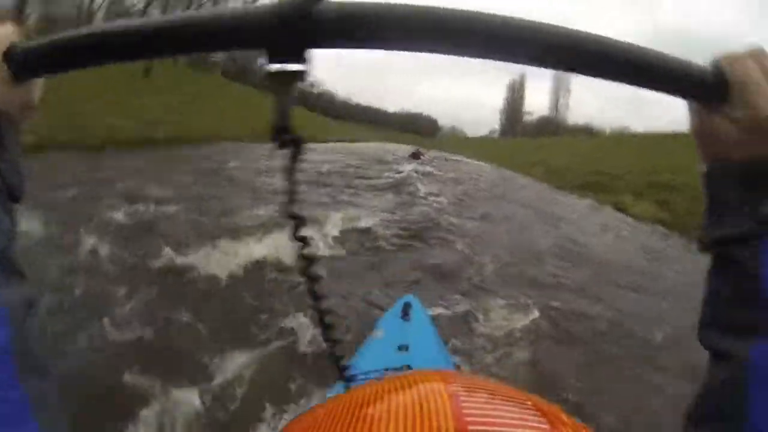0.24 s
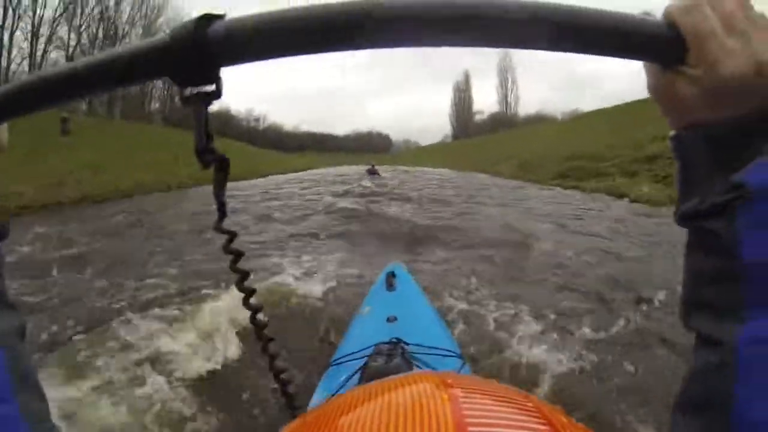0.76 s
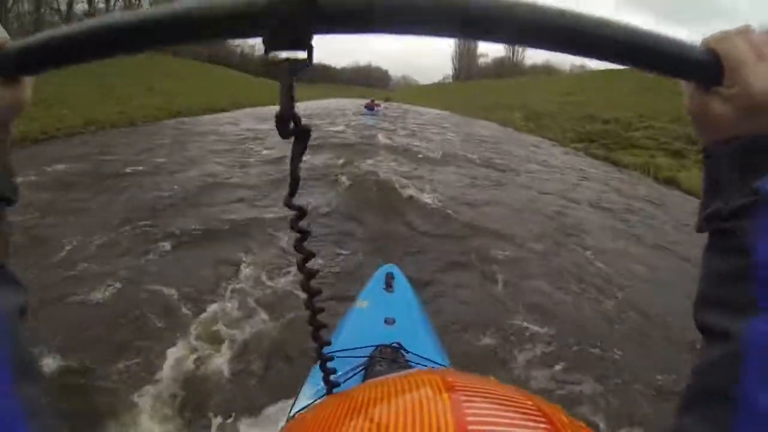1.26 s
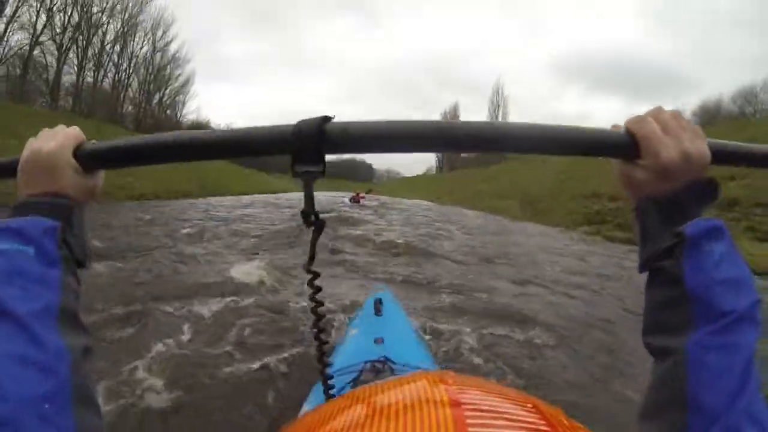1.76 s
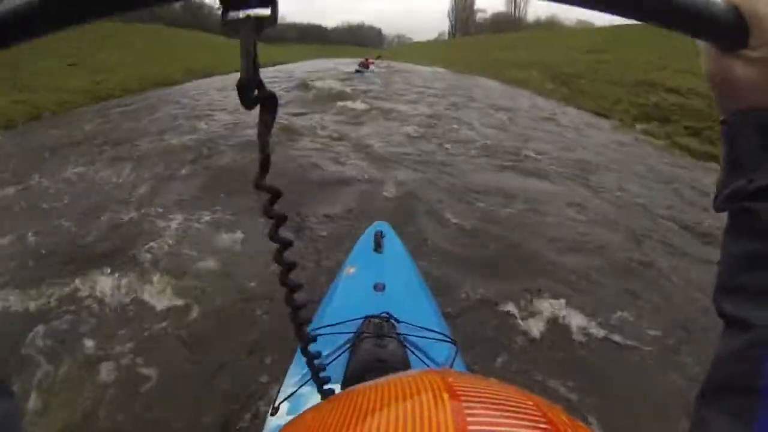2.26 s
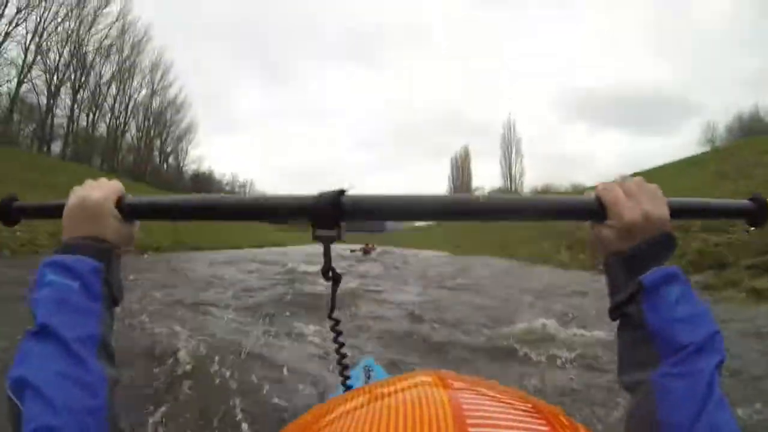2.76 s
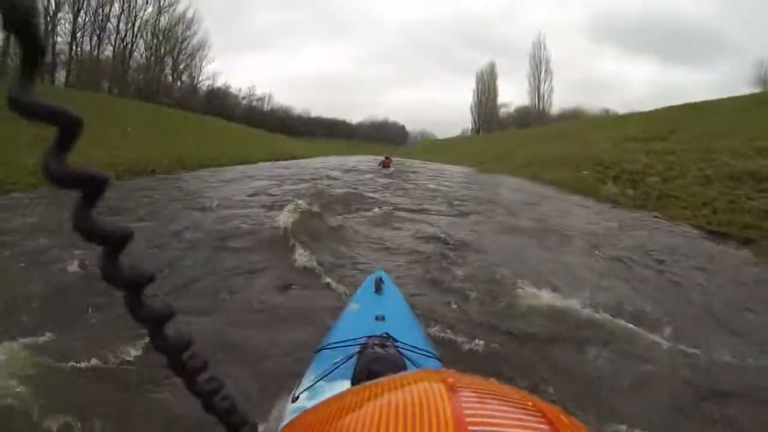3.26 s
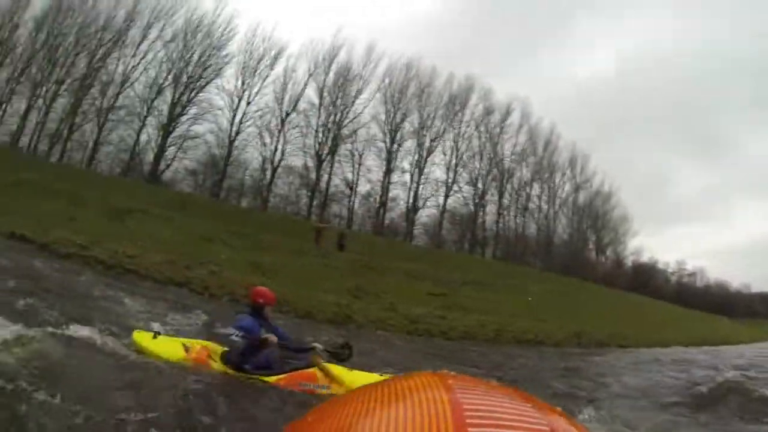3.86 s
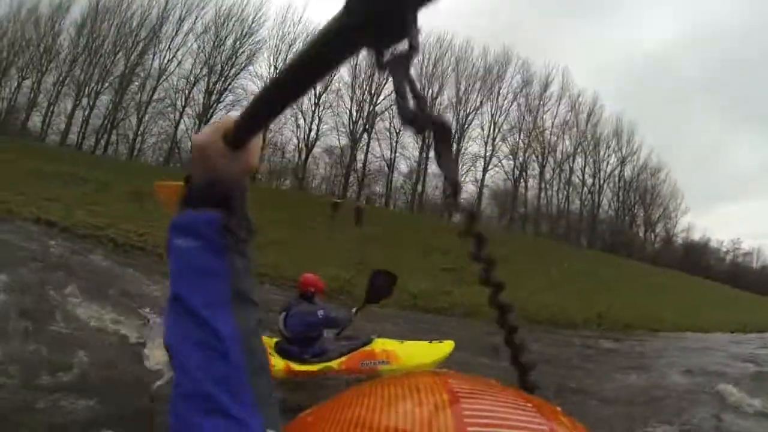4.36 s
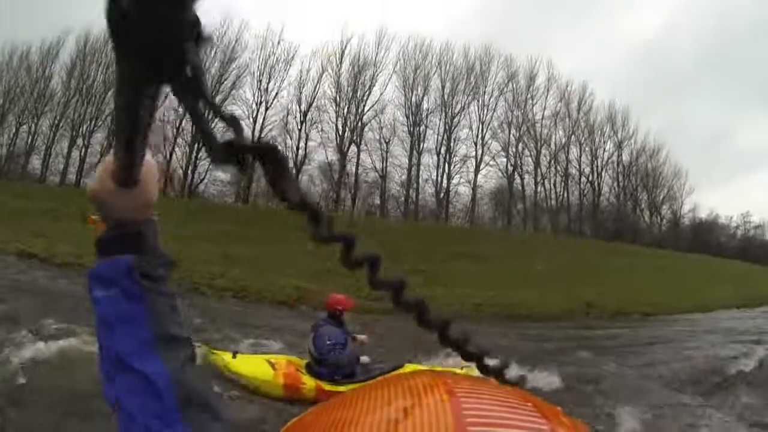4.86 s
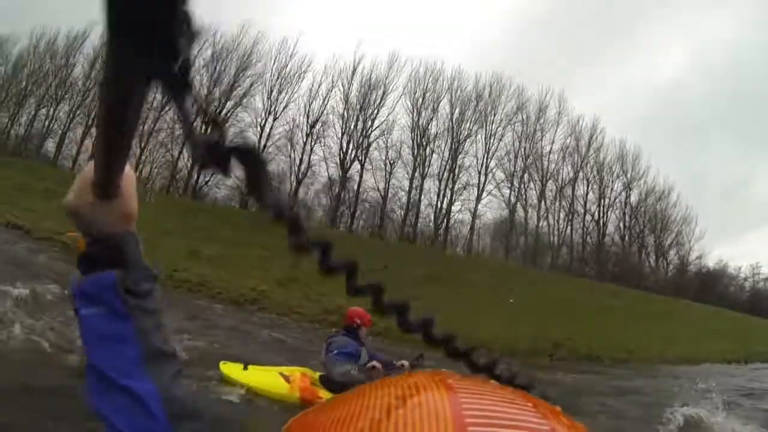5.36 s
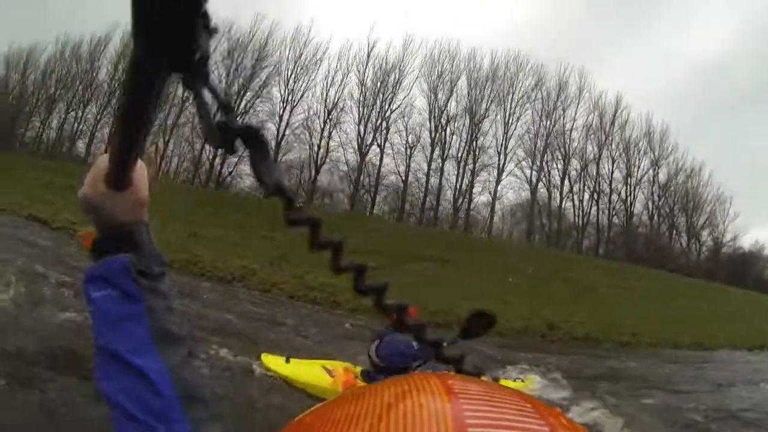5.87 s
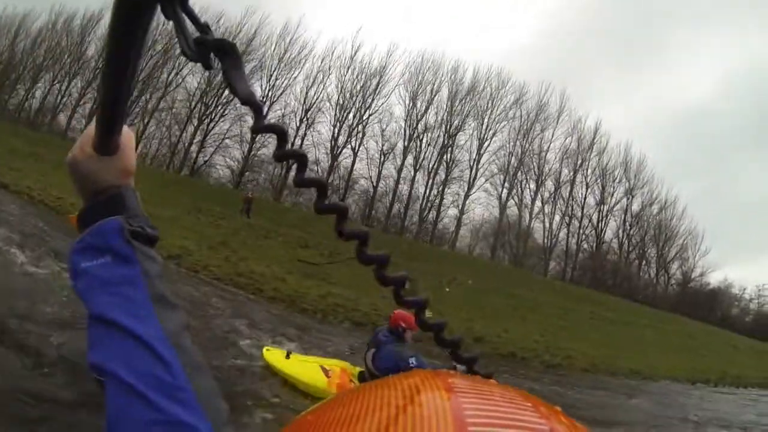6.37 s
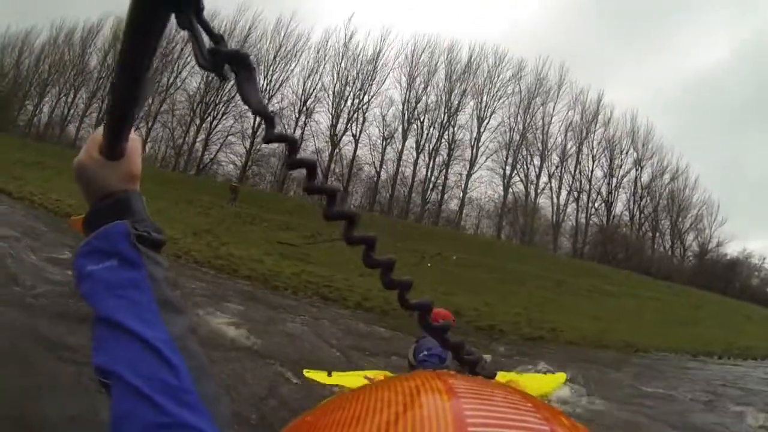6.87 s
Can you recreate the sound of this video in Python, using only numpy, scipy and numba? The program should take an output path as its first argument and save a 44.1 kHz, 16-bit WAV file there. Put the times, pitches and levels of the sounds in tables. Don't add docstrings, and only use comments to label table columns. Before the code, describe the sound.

Steady hollow rush of river water under low, thudding wind gusts, growing rougher midway, with plastic knocks, dull mount creaks and drops tapping the lens.

```python
import sys
import numpy as np
from scipy import signal
from scipy.fft import rfft, irfft, next_fast_len
from scipy.io import wavfile
from scipy.ndimage import uniform_filter1d
from numba import njit

SR = 44100
rng = np.random.default_rng(int(sys.argv[2]) if len(sys.argv) > 2 else 0)


def attenuation_scalar(level_db):
    decades = np.asarray(level_db, float) / 20
    return 10 ** decades


def transcribe(signal):
    frames = np.atleast_2d(signal).T
    limited = np.clip(frames, -1, 1)
    pcm = np.round(limited * 32767).astype(np.int16)
    wavfile.write(sys.argv[1], SR, pcm)


N = 313992

# (time [s], buffeting [dB], share of small quick eddies [dB])
WIND_STRENGTH = [(0.0, -6, -16.5), (0.03, -28.5, 14), (0.67, -18.5, 8.5), (0.73, -27, -17),
                 (0.81, -19, 9.5), (1.55, -31.5, 4.5), (1.63, -21, 7), (2.26, -26.5, 4.5), (2.56, -10, 8.5),
                 (2.79, -22.5, 4.5), (3.15, -17, 9), (3.31, -31, 17), (3.35, -17.5, -2), (5.31, -18.5, -13),
                 (5.35, -29.5, -1.5), (5.47, -13.5, -10), (7.0, -20.5, -11), (7.12, -7.5, -0.5)]
# (time [s], height [of full scale], width [ms], gain ducked after it [dB])
PUSHES = [(0.403, -0.44, 6.8, -2), (0.444, 0.43, 7.4, 3.5), (0.582, 0.39, 11, 2.5), (0.671, 0.37, 16, -2.5),
          (2.467, 0.35, 2.5, 0.5), (2.546, -0.0084, 12, 1), (2.598, 0.72, 3.3, 6), (2.644, -0.29, 5.8, 5.5),
          (2.894, 0.59, 3.5, 4), (2.999, 0.45, 5, 6.5), (3.134, 0.42, 6, 7), (3.169, 0.49, 4.6, 0.5),
          (3.394, -0.54, 4.4, 2.5), (3.5, 0.77, 3.3, 5), (3.611, -0.47, 12, 6.5), (3.836, -0.43, 9, 5.5),
          (4.187, 0.49, 5.6, 10), (4.54, 0.54, 5, 10), (4.826, 0.44, 9.3, 4.5), (5.003, 0.66, 5.4, 9),
          (5.222, -0.51, 3.6, -1.5), (5.309, -0.68, 4.5, 7.5), (5.49, -0.5, 5.3, 6.5),
          (5.546, 0.18, 14, 7.5), (5.745, -0.54, 10, 9), (5.925, 0.21, 27, 5.5), (5.988, -0.35, 7.5, 9.5),
          (6.175, 0.48, 5, 5.5), (6.476, -0.57, 3.5, 10), (7.116, -0.26, 39, 2)]
# (pitch [Hz], level [dB per Hz])
BUFFET_TONE = [(5, -1), (16, 2.5), (27, -0.5), (45, -14), (65, -29), (90, -40.5)]
# (pitch [Hz], level [dB per Hz])
FLUTTER_TONE = [(45, 5.5), (70, 3.5), (120, 1), (170, -5.5), (230, -14), (290, -14), (350, -36.5),
                (480, -62.5)]
# (start [s], length [s], flutter level [dB])
GUSTS = [(0.005, 0.085, -41.5), (0.206, 0.25, -42.5), (0.403, 0.035, -33), (0.496, 0.21, -44),
         (1.616, 0.1, -44.5), (1.797, 0.11, -46), (2.037, 0.036, -43), (2.216, 0.17, -44.5),
         (2.331, 0.22, -41), (2.464, 0.21, -36.5), (2.844, 0.09, -37.5), (2.96, 0.08, -34.5),
         (3.115, 0.074, -30), (3.346, 0.19, -34.5), (3.537, 0.21, -40.5), (3.799, 0.25, -44),
         (4.022, 0.085, -35), (4.116, 0.21, -40), (4.284, 0.27, -35), (4.521, 0.29, -40),
         (4.877, 0.26, -38), (5.193, 0.2, -36), (5.451, 0.092, -37), (5.568, 0.27, -42.5),
         (5.768, 0.22, -41.5), (5.958, 0.09, -35), (6.029, 0.36, -43), (6.421, 0.082, -39.5),
         (6.57, 0.14, -45), (7.078, 0.036, -37.5)]
# (time [s], peak [dB], pitch [Hz])
PUFFS = [(1.66, -34.5, 144.8), (1.72, -29, 124), (2.045, -37.5, 192.6), (2.465, -44.5, 148.5),
         (2.528, -41, 171), (2.59, -42, 194.7), (2.835, -33, 187.3), (2.872, -35.5, 168), (2.9, -21, 144.3),
         (2.905, -32.5, 224.6), (2.963, -24, 192.7), (2.968, -35, 256), (3.015, -37, 194.5),
         (3.075, -42.5, 217.3), (3.13, -29.5, 174.7), (3.15, -28, 262), (3.19, -39, 232), (3.318, -42, 270),
         (3.365, -26.5, 145.8), (3.41, -28, 132.3), (3.44, -39, 208.3), (3.478, -24.5, 130.5),
         (3.545, -33, 126.2), (3.59, -38.5, 178), (3.92, -31.5, 109.6), (4.04, -26, 131.6),
         (4.06, -24, 183.5), (4.075, -36, 242), (4.165, -36.5, 260), (4.243, -37.5, 260),
         (4.29, -33.5, 221), (4.315, -28.5, 193.3), (4.365, -31, 209), (4.4, -29.5, 126.3),
         (4.43, -34, 106.9), (4.74, -43.5, 239), (4.77, -33.5, 137), (5.214, -40, 147.5),
         (5.978, -38.5, 147.4)]
# (time [s], peak [dB], dull part [dB], rattle length [ms])
KNOCKS = [(1.34, -38.5, -20.5, 1.2), (1.423, -31.5, -28, 2.5), (2.189, -37, -21.5, 1.2),
          (2.4877, -21.5, -26, 1.4), (2.627, -43.5, -5, 1.7), (2.981, -30, 3, 4.5), (3.15, -21, -0.5, 1.7),
          (3.202, -42, -5.5, 1.6), (3.287, -38, -14, 3.1), (4.2495, -40, -8, 1.2), (4.302, -39.5, -6, 2.5),
          (5.473, -36, -11, 2.1), (5.674, -39, -20, 4), (5.707, -29.5, -23.5, 2.9),
          (5.896, -50.5, -15, 1.6), (5.919, -34, -20, 2), (5.97, -40, -10, 2.8), (3.244, -30, -16, 4.6),
          (3.375, -36, 9, 2.1), (3.984, -34.5, -20, 1.2), (4.321, -31.5, 8.5, 1.1), (4.641, -37, 9.5, 1.5),
          (4.929, -41, 12, 1.2), (5.1703, -28.5, 5.5, 1), (5.194, -30, 2, 2.1), (5.217, -28.5, 5.5, 1.4),
          (5.352, -39, 1, 2), (5.377, -38, 9, 1.1), (5.45, -38, 6.5, 1.1), (5.487, -22.5, -6, 2),
          (5.528, -24, -17, 2.2), (5.698, -27, -29, 4.1), (5.628, -34.5, -9, 3.7), (5.728, -18.5, -8.5, 3),
          (5.767, -38, -18, 2.6), (5.827, -33, -8.5, 4.4), (5.915, -27.5, -11, 6.1),
          (5.946, -26, -14.5, 3.5), (5.985, -30.5, -17, 3.8)]
# (time [s], peak [dB], bright part [dB], dull part [dB])
TAPS = [
    (2.351, -26, -12, -23),
    (3.134, -34, 9, 8.5),
    (3.164, -35, 1, 2),
    (3.517, -53, -7, -16),
    (4.243, -27.5, -7, 6),
    (4.37, -28, -12, 2),
    (5.257, -44, -6, -9),
]
# (pitch [Hz], level [dB], time to fall 60 dB [s])
HOUSING_MODES = [(793, 6.5, 0.0092), (1066, 5.5, 0.0099), (1273, 7, 0.01), (1394, 7.5, 0.016),
                 (1507, 9.5, 0.011), (1750, -11, 0.013), (2430, -4, 0.0094), (2470, 3.5, 0.011),
                 (3150, -10.5, 0.0087)]
# (pitch [Hz], peak [dB])
HARD_KNOCK_PARTIALS = [(770, -23), (1100, -19), (1270, -13), (1480, -17.5), (1900, -36), (2560, -29.5),
                       (3250, -45.5), (4200, -54.5)]
# (centre [s], peak [dB], half length [s])
CHATTERS = [(2.535, -35, 0.022), (2.78, -36, 0.024), (3.13, -34, 0.06), (3.26, -32.5, 0.029),
            (4.034, -36, 0.066), (4.32, -45, 0.035), (5.097, -34.5, 0.017), (5.223, -43, 0.019),
            (5.493, -26.5, 0.027), (5.693, -33, 0.041), (5.84, -42, 0.036), (5.44, -51, .03),
            (5.638, -45, 0.027), (5.776, -32, 0.016), (5.917, -23, 0.011), (5.673, -36, .01),
            (5.96, -44, .01), (7.056, -36, .01), (7.076, -30, .007), (6.992, -38, .008),
            (5.975, -37, 0.013), (6.37, -41, 0.024), (7.038, -37, 0.21)]
# (start [s], length [s], level [dB])
MOUNT_WORKS = [
    (0.307, 0.53, 0),
    (2.357, 4.4, -1.5),
    (6.701, 0.59, -1.5),
]
# (time [s], peak [dB], pitch [Hz])
DULL_TONES = [(2.419, -41.5, 400), (2.519, -47, 450), (2.574, -35.5, 518), (3.027, -39.5, 650),
              (3.085, -37, 676), (3.196, -37, 720), (3.41, -40.5, 483), (3.486, -39, 435), (3.687, -49, 403),
              (4.115, -47, 800), (4.166, -37, 483), (4.29, -47, 730), (4.316, -33, 685), (4.463, -40, 445),
              (4.677, -46, 417), (4.777, -41.5, 445), (4.952, -44, 450), (5.002, -35, 510), (5.053, -44, 420),
              (5.093, -47.5, 450), (5.468, -36, 814), (5.509, -58.5, 450), (5.518, -30.5, 916),
              (5.575, -49.5, 425), (5.61, -45.5, 448), (5.638, -41, 870), (5.722, -38.5, 422), (5.809, -45, 450),
              (5.835, -45.5, 522), (5.94, -36.5, 819), (6.0, -41.5, 445), (6.152, -34, 486), (6.4, -42.5, 398),
              (6.531, -46, 420)]
# (time [s], peak [dB], pitch [Hz])
DRIPS = [
    (.661, -34, 3310),
    (5.838, -49, 2560),
    (6.349, -44.5, 3270),
]
# (time [s], peak [dB], pitch [Hz])
PINGS = [(1.5, -34, 1420), (2.348, -31.5, 1980), (5.3, -38, 1500), (2.8, -40.5, 1100), (3.514, -32, 1770),
         (6.2, -40.5, 2800), (4.369, -35.5, 2500), (3.4, -42, 2350), (5.195, -32, 1320), (3.163, -40, 3070),
         (2.562, -36, 2600), (5.093, -42, 2270), (0.9, -40, 3900), (.66, -49, 1900)]
# (time [s], level near 4.5 kHz [dB])
RAPID_LEVEL = [(0, -54.5), (.8, -55.5), (1.5, -55.5), (1.9, -58.5), (2.8, -58.5), (3.6, -59.5), (4.5, -60),
               (5.7, -60.5), (6.27, -62.5), (6.43, -57.5), (6.7, -61.5), (7.12, -63)]
# (pitch [Hz], level [dB per Hz])
WATER_TONE = [(200, -16), (420, -19.5), (750, -17.5), (1120, -9), (1460, -1.5), (1630, -5.5), (1880, -10.5),
              (3200, -15), (3800, -21.5), (5000, -23.5), (6300, -32), (12500, -39.5), (14000, -46),
              (15300, -94)]
# (time [s], lift [dB], extra brightness [dB])
SPRAYS = [(.07, 0, 1), (.35, 2.5, 3), (.39, 1, 2), (.51, 0.5, 2), (.565, 2.5, -1), (.63, 1.5, -1),
          (.665, 3, 0), (3.76, -6, 5), (1.89, 2, -3), (.76, 2.5, 4), (.8, 2, 3), (1.219, 3.5, -3),
          (2.356, 6, 2), (2.599, -1, 2.5), (2.77, 3, -3), (3.0, -2.5, 9), (3.83, -3.5, 5), (4.17, -2.5, 3),
          (4.76, 1, 6), (4.81, -5, 4), (5.002, 1.5, 0), (5.3, -3.5, 6), (5.71, 2, 1), (5.811, 4.5, 4),
          (5.912, 0, 3), (6.06, 1, 5), (6.17, 0, 0), (6.44, -1, 1)]
# (time [s], lift [dB], extra brightness [dB])
SPLATS = [(5.005, 6, -3), (5.3, 5, 3), (5.362, 3, 4), (5.737, 0, 5), (5.75, 0.5, 4), (5.838, 3.5, 4),
          (5.055, 4.5, 4), (5.2, 2.5, 6), (3.37, 3, 6), (3.589, 5, 2), (3.715, 0.5, 9), (3.835, 3, 3),
          (5.928, 2.5, 6), (5.988, 11, 8), (6.088, 10, 7), (6.155, 4, 8), (6.319, 7, 5), (6.449, 9, 6),
          (6.482, 1, 11), (2.469, 4.5, 0), (2.603, 5, 9), (4.535, 4, -3), (4.165, 4.5, 10)]
# (time [s], peak [dB])
TICKS = [(2.469, -55.5), (2.485, -52.5), (2.577, -52.5), (2.6056, -56), (2.647, -53.5), (2.7831, -66),
         (2.8966, -61.5), (3.001, -44), (3.1681, -47.5), (3.5075, -55), (3.5902, -48), (3.701, -47),
         (3.7487, -50), (4.1703, -52), (4.1753, -51), (4.228, -51), (4.346, -52), (4.518, -45),
         (4.5348, -48.5), (4.5993, -50.5), (4.682, -49), (4.69, -51.5), (4.7363, -49), (4.7946, -47.5),
         (4.801, -49.5), (4.812, -47.5), (4.9145, -46), (5.0022, -53), (5.0075, -43.5), (5.0161, -51),
         (5.0687, -56), (5.073, -52), (5.107, -59), (5.2874, -50), (5.5122, -53), (5.5763, -47.5),
         (5.5829, -54), (5.6123, -57), (5.628, -57), (5.6662, -53), (5.7243, -52.5), (5.8098, -49),
         (5.8152, -51.5), (5.8476, -53), (5.9127, -49.5), (5.95, -52), (5.9902, -51), (5.836, -52),
         (6.001, -52.5), (6.0084, -51.5), (6.045, -53.5), (6.0566, -52), (6.0635, -49.5), (6.1542, -54.5),
         (6.1662, -49), (6.448, -47), (6.458, -53.5), (6.5053, -52), (6.533, -48.5), (6.6303, -50.5)]


def gusts_db():
    start_s, length_s, db = np.transpose(GUSTS)
    lull_db = -51
    hold_s = np.clip(length_s - .03, 0, None)
    gust = ramps(start_s + 0.01, hold_s, db, rise=410, fall=311)
    return np.maximum(gust, lull_db)


def wind(buffet_db, quick_db, flutter_db):
    eddy_split_hz, edge_split_hz = 43, 290
    lumps_db, brightens = 2.5, 0.097
    t = np.arange(N) / SR
    pushes, calm = np.zeros(N), np.ones(N)
    for s, height, width_ms, _ in PUSHES:
        near = slice(max(int((s - .25) * SR), 0), int((s + .25) * SR))
        u = (t[near] - s) / (width_ms / 1000)
        pushes[near] += height * (1 - 0.12 * u ** 2) * np.exp(-.45 * u ** 2 / (1 + 0.62 * np.abs(u)))
        calm[near] *= 1 - 0.46 * np.exp(-(u / 3) ** 2)

    buffet = tilted(coloured(rng.standard_normal(N), BUFFET_TONE), eddy_split_hz, quick_db)
    buffet = attenuation_scalar(uniform_filter1d(buffet_db, size=1800) + 3) * buffet
    buffet = buffet / uniform_filter1d((buffet / attenuation_scalar(buffet_db)) ** 2, size=5000) ** 0.5

    flutter = coloured(rng.standard_normal(N), FLUTTER_TONE)
    flutter = flutter / uniform_filter1d(flutter ** 2, size=1800) ** 0.5
    flutter = rms_one(flutter * attenuation_scalar(lumps_db * drift(31)))
    flutter = tilted(flutter, edge_split_hz, brightens * (flutter_db + 25.5))
    soft_buffet = 0.69 * np.tanh(buffet / 0.48)
    return pushes + calm * soft_buffet + attenuation_scalar(flutter_db + 1.5) * flutter


def puffs():
    return bursts(PUFFS, cycles=8.6)


def knocks():
    size = 1500
    knock_bright_db, tap_ms, rattle_share = -28, 0.8, .45
    hits = [(s, db, dull, knock_bright_db, ms) for s, db, dull, ms in KNOCKS]
    hits += [(s, db, dull, bright, tap_ms) for s, db, bright, dull in TAPS]
    lengths_ms = np.clip(np.array(hits)[:, 4:], .5, 8)
    age = np.arange(size) / (lengths_ms * SR / 1000)
    fade = age * np.exp(-age)
    fade = fade / np.sqrt(np.sum(fade ** 2, axis=1, keepdims=True) * .15)
    rattle = rng.standard_normal(age.shape) * (rng.random(age.shape) < .15)
    strengths_db = rng.normal(0, 0.43, (len(hits), len(HOUSING_MODES)))
    phases = rng.random(strengths_db.shape)
    out = np.zeros(N)
    for m, (hz, level_db, t60) in enumerate(HOUSING_MODES):
        clicks = np.zeros(N + size)
        for k, (s, peak_db, dull_db, bright_db, _) in enumerate(hits):
            colour_db = dull_db if m < 1 else bright_db if m > 5 else 0
            start = int((s - .001) * SR)
            turns = hz * np.arange(size) / SR + phases[k, m]
            in_step = np.cos(2 * np.pi * turns) * 2 / fade[k].sum()
            contact = fade[k] * (in_step + rattle_share * rattle[(k + m) % len(hits)])
            hit_db = peak_db + colour_db + level_db + strengths_db[k, m] - 2.5
            clicks[start:start + size] += contact * attenuation_scalar(hit_db)
        out += ring(clicks[:N], hz, t60)
    return filtered(out, 4, [560, 3500], "band")


def hard_knock():
    when_s, length_s, shortens = 4.243, 0.015, 0.27
    out = np.zeros(N)
    for hz, db in HARD_KNOCK_PARTIALS:
        cycles = hz * length_s * (1200 / hz) ** shortens
        out += bursts([(when_s, db, hz)], cycles)
    return out


def creak(flutter_db):
    per_s, spread_db = 400, 3.0
    working = attenuation_scalar(ramps(*np.transpose(MOUNT_WORKS), rise=300, fall=300))
    creak_db = -58 + 0.3 * (flutter_db + 35.0) + 2 * drift(27)
    centre_s, chatter_db, half_s = np.transpose(CHATTERS)

    sizes = attenuation_scalar(spread_db * np.minimum(rng.exponential(1, (2, N)), 3)) * rng.choice([-1, 1], (2, N))
    happens = rng.random((2, N)) < np.array([[per_s], [4 * per_s]]) / SR
    dull_slips, quick_slips = sizes * happens
    dull = ring(dull_slips, 249, 0.017)
    dull = dull - ring(dull_slips, 628, 0.0075) + ring(dull_slips, 955, 0.0039)
    quick = ring(quick_slips, 1510, 0.012) - ring(quick_slips, 1330, 0.012)
    quick = quick + .5 * ring(quick_slips, 1050, 0.008) - .4 * ring(quick_slips, 1800, 0.007)
    dull = rms_one(filtered(dull, 2, [300, 2200], "band"))
    quick = rms_one(filtered(quick, 2, [800, 2100], "band"))
    return working * attenuation_scalar(creak_db + 7) * dull + bumps(centre_s, attenuation_scalar(chatter_db - 12.5), half_s) * quick


def dull_tones():
    return bursts(DULL_TONES, cycles=5.9)


def drips():
    return bursts(DRIPS, cycles=70.0)


def rim_pings():
    return bursts(PINGS, cycles=28.0)


def water(bright_db):
    per_s, spread_db, cycles = 4000, 4.0, 2.9
    fizz_db, patchy_db = -5, 1.6
    sizes = attenuation_scalar(spread_db * np.minimum(rng.exponential(1, N), 5)) * rng.choice([-1, 1], N)
    born = rng.random(N) < per_s / SR
    pitches = np.geomspace(500, 12000, 14)
    dealt = rng.integers(0, 14, N)
    foam = np.zeros(N)
    for k, hz in enumerate(pitches):
        foam += ring(sizes * born * (dealt == k), hz, cycles / hz) * hz
    rush = rng.standard_normal(N)
    size = next_fast_len(N)
    whole = rfft(coloured(rush + attenuation_scalar(fizz_db) * rms_one(foam), WATER_TONE), size)

    place = 2 * np.log2(np.linspace(1, SR / 2, len(whole)) / 200)
    together = drift(19)
    out = np.zeros(N)
    for k in range(14):
        patch = irfft(whole * np.clip(1 - np.abs(place - k), 0, 1), size)[:N]
        tilt_db = np.clip((k - 9) / 2, 0, 1) * (bright_db + 10)
        swell_db = patchy_db * (0.15 * together + drift(29))
        out += patch * attenuation_scalar(tilt_db + swell_db)
    return out


def rapid():
    s, lift_db, extra_db = np.transpose(SPRAYS + SPLATS)
    half_s = np.repeat([0.019, 0.0013], [len(SPRAYS), len(SPLATS)])
    nearness_db = in_time(RAPID_LEVEL)[0] + 60
    bright_db = -13 + 0.06 * nearness_db - drift(4) + bumps(s, extra_db, half_s)
    return attenuation_scalar(-44.0 + bumps(s, lift_db, half_s)) * water(bright_db)


def rms_one(x):
    return x / np.sqrt(np.mean(x ** 2) + 1e-20)


def filtered(x, order, hz, kind="low"):
    return signal.sosfilt(signal.butter(order, hz, kind, fs=SR, output="sos"), x)


def in_time(rows):
    s, *columns = np.transpose(rows)
    return [np.interp(np.arange(N) / SR, s, c) for c in columns]


def drift(rate):
    r = np.exp(-80 * np.pi * rate / SR)
    noise = rng.standard_normal(N // 40 + 2002)
    slow = signal.lfilter([1], [1, -2 * r, r * r], noise)[2000:]
    return np.interp(np.arange(N) / 40, np.arange(len(slow)), rms_one(slow))


def coloured(x, tone):
    size = next_fast_len(N)
    hz, db = np.transpose(tone)
    bins_hz = np.arange(size // 2 + 1) * SR / size
    gain = attenuation_scalar(np.interp(np.log(bins_hz + 1), np.log(hz), db, left=-90, right=-90))
    return rms_one(irfft(rfft(x, size) * gain, size)[:N])


def tilted(x, hz, db):
    low = signal.sosfiltfilt(signal.butter(2, hz, fs=SR, output="sos"), x)
    return low + attenuation_scalar(db) * (x - low)


def ring(clicks, hz, t60):
    r, w = attenuation_scalar(-60 / (t60 * SR)), 2 * np.pi * hz / SR
    return signal.lfilter([0, np.sin(w)], [1, -2 * r * np.cos(w), r * r], clicks + 1e-18)


def bursts(rows, cycles):
    out, t = np.zeros(N + 4096), np.arange(4096) / SR
    for s, db, hz in rows:
        age = t * hz / cycles * np.log(1000)
        swell = np.e * age * np.exp(-age)
        out[int(s * SR):][:4096] += attenuation_scalar(db) * swell * np.sin(2 * np.pi * hz * t)
    return out[:N]


def ramps(s, length, db, rise, fall):
    t = np.arange(0, N + 32, 32) / SR
    s, length, db = np.array([s, length, db])[:, :, None]
    before, after = np.clip(s - t, 0, None), np.clip(t - s - length, 0, None)
    top = np.max(db - rise * before - fall * after, axis=0)
    return np.interp(np.arange(N) / SR, t, top)


def bumps(s, height, half_s):
    t = np.arange(0, N + 32, 32) / SR
    s, height, half_s = np.array([s, height, half_s])[:, :, None]
    swells = np.sum(height * np.exp(-((t - s) / half_s) ** 2), axis=0)
    return np.interp(np.arange(N) / SR, t, swells)


def scene():
    flutter_db = gusts_db()
    near = wind(*in_time(WIND_STRENGTH), flutter_db) + puffs()
    near = near + knocks() + hard_knock()
    near = near + creak(flutter_db) + dull_tones()
    near = near + drips() + rim_pings()
    return (near / attenuation_scalar(wanted_gain_db()) + rapid())[None]


def wanted_gain_db():
    s, ducks_db = np.transpose(PUSHES)[[0, 3]]
    lag_s, fall_db_per_s, recover_db_per_s = 0.0042, 850, 44
    lowest_s = s + lag_s + ducks_db / fall_db_per_s
    duck_db = ramps(lowest_s, 0 * s, ducks_db, fall_db_per_s, recover_db_per_s)
    return in_time(RAPID_LEVEL)[0] + 60 - np.clip(duck_db, 0, None)


@njit
def stepped(x, want_db, step_db, timeout):
    held, last, now = np.empty(len(x)), 0, want_db[0]
    for i in range(len(x)):
        behind = want_db[i] - now
        crossing = x[i] * x[i - 1] < 0
        overdue = behind < -3 * step_db and i - last > timeout
        if abs(behind) > step_db / 2 and (crossing or overdue):
            if crossing:
                now += step_db * min(max(np.round(behind / step_db), -2), 2)
            else:
                now -= step_db
            last = i
        held[i] = now
    return held


def ticks():
    s, db = np.transpose(TICKS)
    jumps = np.zeros(N)
    jumps[(s * SR).astype(int)] = attenuation_scalar(db + 19.5) * (-1.) ** np.arange(len(s))
    steps = filtered(np.cumsum(jumps) + 1e-18, 2, 265, "high")
    return filtered(steps, 1, 4500)


def top_cut(x):
    return signal.sosfilt(signal.butter(12, 15700, fs=SR, output="sos"), x)


def record(dry):
    want_db = wanted_gain_db()
    late = filtered(dry[0], 1, 70)
    held_db = stepped(late, want_db + 1.5 * drift(40), 1.5, 500)
    busy = uniform_filter1d(np.clip((3.5 - want_db) / 3, .25, 1), size=4000)
    gain_db = want_db + .08 * busy * (held_db - want_db)
    level = dry * attenuation_scalar(gain_db)
    slow = signal.sosfiltfilt(signal.butter(2, 300, fs=SR, output="sos"), level)
    level = 0.58 * np.tanh(slow / 0.76) + 0.85 * (level - slow) + ticks()
    mix = filtered(level - level.mean(), 4, 13800)
    return top_cut(mix)


dry = scene()
out = record(dry)
transcribe(out)
```